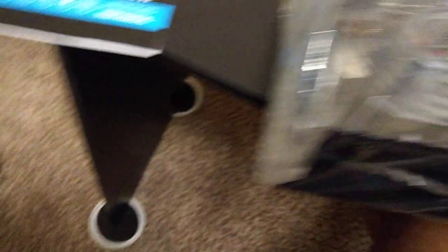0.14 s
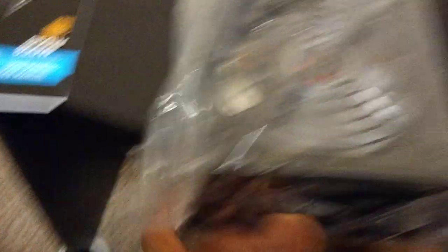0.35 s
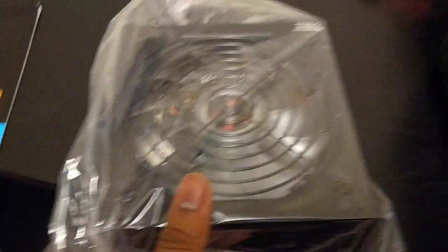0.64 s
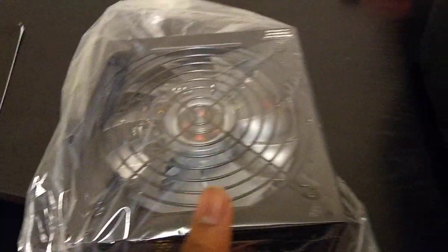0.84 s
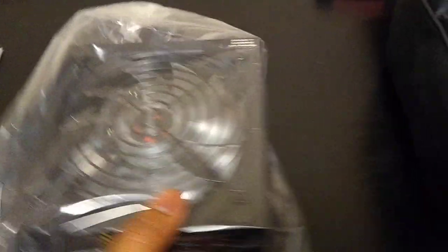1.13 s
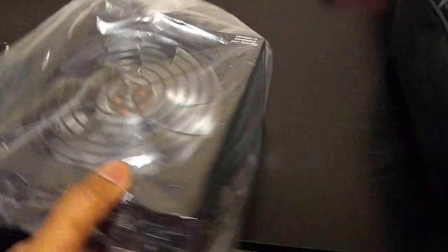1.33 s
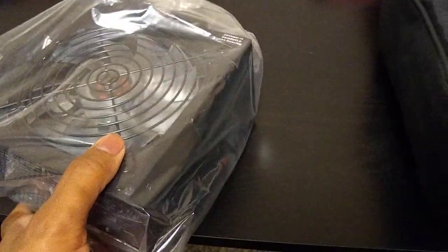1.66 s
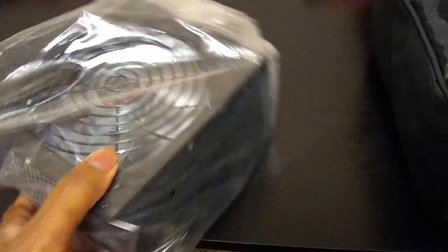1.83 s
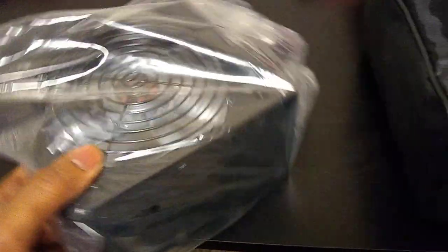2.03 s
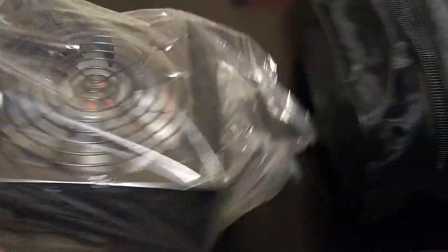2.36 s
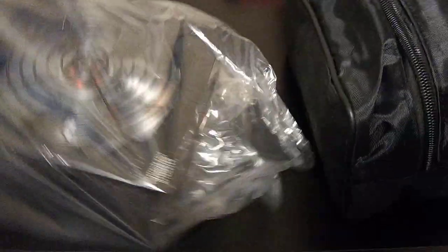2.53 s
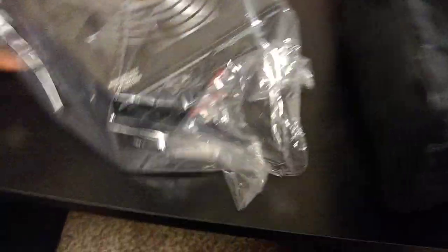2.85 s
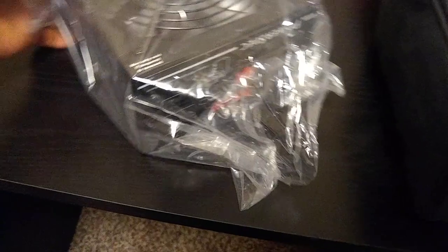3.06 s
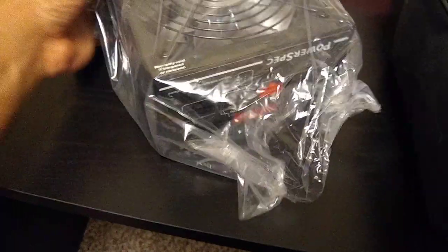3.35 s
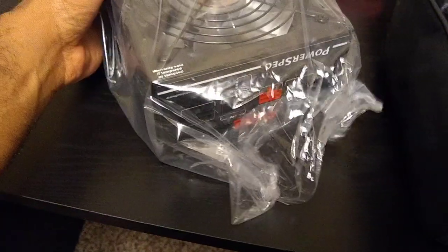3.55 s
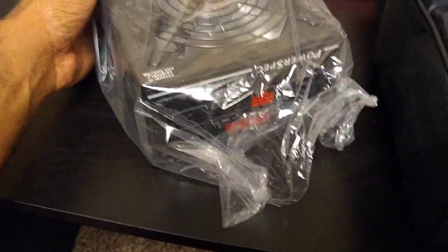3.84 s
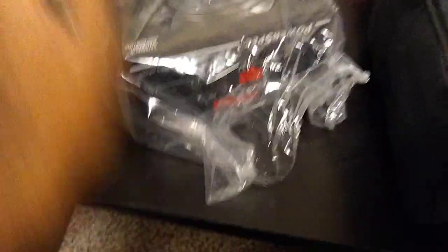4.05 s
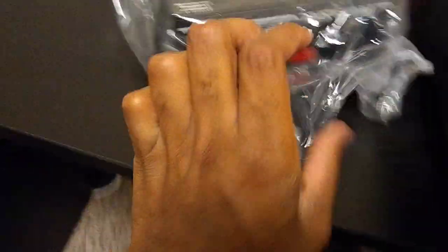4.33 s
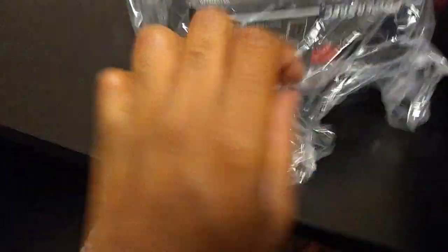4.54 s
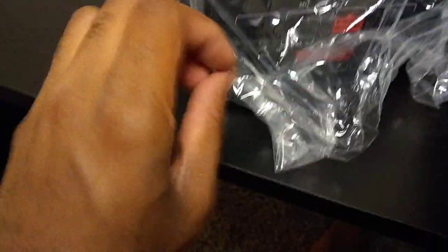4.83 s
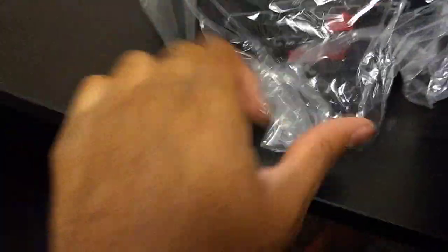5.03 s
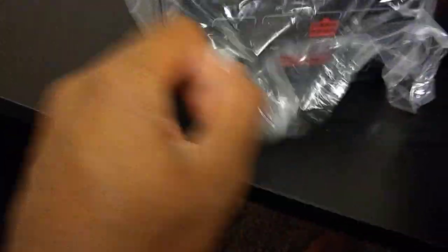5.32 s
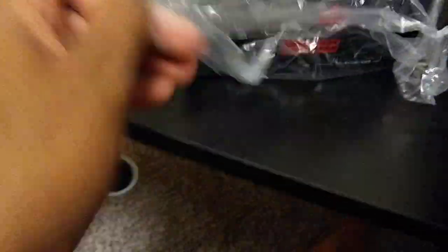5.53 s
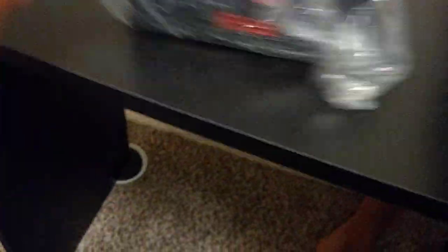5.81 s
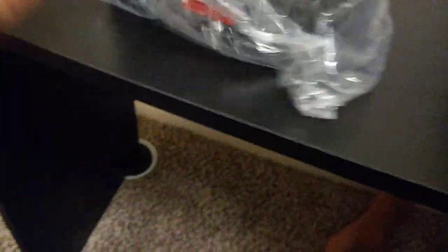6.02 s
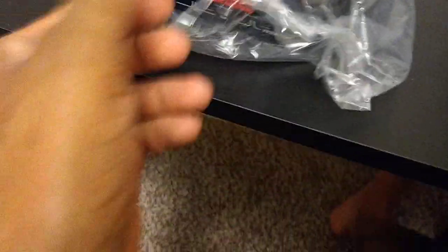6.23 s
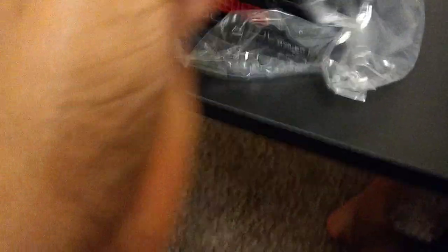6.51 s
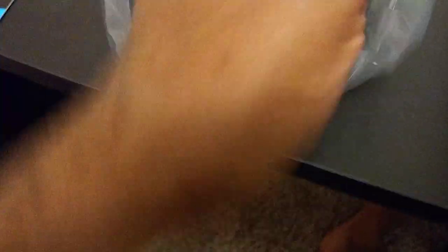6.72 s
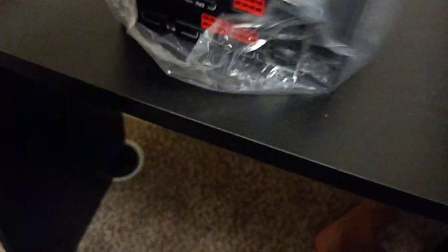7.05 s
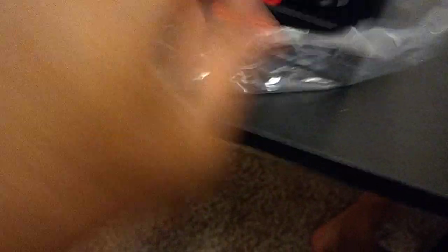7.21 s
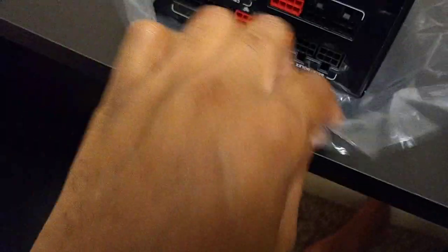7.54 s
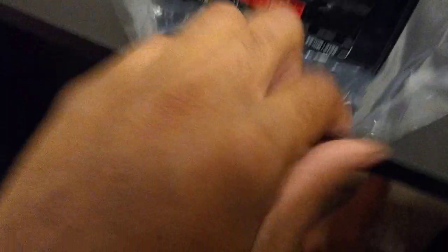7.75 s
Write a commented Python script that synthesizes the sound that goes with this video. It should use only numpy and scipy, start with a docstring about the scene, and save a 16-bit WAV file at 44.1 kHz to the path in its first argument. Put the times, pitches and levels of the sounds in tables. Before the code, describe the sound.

Close to the microphone in a small carpeted room, a hand handles thin plastic film around a heavy metal case. Light ticks and rustles come first, then one solid knock on the desk and a short dull drag. Sharper crinkles and snaps follow with a softer bump, a brief lull, then denser, louder crackling as the bag is gathered and tugged, over a very faint steady hush.

```python
"""A thin plastic bag rustles, ticks and snaps as a hand gathers and pulls it: swarms of tiny noise clicks.
Inside is a metal power supply; its case knocks on a desk as decaying sines with noise thuds, and drags
as a dense swarm of dull clicks. Film sliding with the case adds a smooth hiss of coloured noise.
Faint gliding sine tones and a steady noise hush lie behind, in a small carpeted room of decaying noise echoes.
All is heard from close by through the two ports of a phone, which widens the stereo and limits the band."""
import sys
import numpy as np
from scipy import signal
from scipy.fft import rfft, irfft, next_fast_len
from scipy.io import wavfile
from scipy.ndimage import uniform_filter1d

SR = 44100
rng = np.random.default_rng(int(sys.argv[2]) if len(sys.argv) > 2 else 0)


def bounce(signal):
    """Save signal as a 16-bit WAV file at the path given by the first command-line argument."""
    frames = np.transpose(np.atleast_2d(signal))
    limited = np.clip(frames, -1, 1)
    pcm = np.round(limited * 32767).astype(np.int16)
    wavfile.write(sys.argv[1], SR, pcm)


N = 347508
TIME = np.arange(N) / SR  # seconds
TOP_HZ = 15750  # upper edge of the band


def amp(db):
    """Decibels to gain."""
    return 10 ** (np.asarray(db) / 20)


def unit(x):
    """Scale a sound to rms 1."""
    return x / np.sqrt(np.mean(x ** 2) + 1e-20)


def along(points, hz):
    """Read a curve of (Hz, value) points on a log frequency axis."""
    f, v = np.transpose(points)
    return np.interp(np.log(hz + 1), np.log(f + 1), v)


def filtered(x, response):
    """Multiply the spectrum of x by a response, given as a function of frequency."""
    m = next_fast_len(N + SR // 4)
    hz = np.fft.rfftfreq(m, 1 / SR)
    return irfft(rfft(x, m) * response(hz), m)[..., :N]


def coloured(x, spectrum, size=2048):
    """Colour x with a minimum-phase filter of unit energy, so that nothing sounds ahead of time."""
    hz = np.fft.rfftfreq(size, 1 / SR)
    cepstrum = irfft(np.log(amp(along(spectrum, hz))))
    # folding the cepstrum forward in time makes the filter causal
    cepstrum[1:size // 2] *= 2
    cepstrum[size // 2 + 1:] = 0
    kernel = irfft(np.exp(rfft(cepstrum)))
    kernel = kernel[None] / np.linalg.norm(kernel)
    return signal.fftconvolve(x, kernel, axes=1)[:, :x.shape[1]]


def add(track, s, sound):
    """Mix a sound into a track at s seconds."""
    part = track[:, round(s * SR):][:, :sound.shape[-1]]
    part += sound[..., :part.shape[1]]


# Spectrum of the hush. Each row: frequency in Hz, relative density in dB per Hz.
HUSH_SPECTRUM = [(25, -15.5), (130, 0), (300, 1.5), (550, -2.5), (1200, -14), (2200, -14), (3300, -20.5),
                 (7000, -27.5), (15500, -21.5)]


def hush():
    """A faint steady bed of coloured noise, partly alike at both ports."""
    noise = rng.standard_normal((2, N)) + rng.standard_normal(N)
    return amp(-77.0) * unit(coloured(noise, HUSH_SPECTRUM))


# Faint low tones. Each row: start in seconds, end in seconds, start pitch in Hz, end pitch in Hz,
# peak level in dB before a trim of -4 dB.
TONES = [(4.04, 4.239, 455, 447, -67), (6.38, 6.7, 155.6, 146.5, -67.5), (7.05, 7.25, 106.7, 115.4, -62),
         (7.12, 7.529, 201, 121.7, -68), (7.5, 7.858, 113, 108, -65)]


def tones():
    """Sines that glide in a straight line and swell and fade along half a sine arch."""
    track = np.zeros((2, N))
    for start, end, start_hz, end_hz, db in TONES:
        u = np.linspace(0, 1, int((end - start) * SR))
        pitch = start_hz + (end_hz - start_hz) * u
        phase = 2 * np.pi * np.cumsum(pitch) / SR
        add(track, start, amp(db - 4.0) * np.sin(np.pi * u) * np.sin(phase))
    return track


# How fast the room dies away. Each row: frequency in Hz, time to fall by 60 dB in seconds.
ROOM_DECAY = [(100, 0.27), (400, 0.17), (2000, 0.082), (8000, 0.06), (16000, 0.082)]


def room(x, alike_hz):
    """Noise echoes, drawn anew every eighth of a second so that no pitch lingers; each frequency has its own decay."""
    wet, step = np.zeros((2, N)), SR // 8
    for start in range(0, N, step):
        hz, t, z = signal.stft(rng.standard_normal((2, SR // 3)), SR, nperseg=256)
        decay = amp(-60 * t / along(ROOM_DECAY, hz)[:, None])
        tail = signal.istft(z * decay, SR, nperseg=256)[1]
        echo = signal.fftconvolve(x[:, start:start + step], tail / np.linalg.norm(tail[0]), axes=1)
        add(wet, start / SR + .003, echo)  # the echo sets in 3 ms late
    # long waves reach both ports alike: all mid at the bottom, equal mid and side at the top
    turn = lambda hz: np.pi / 4 * (1 - 1 / (1 + (hz / alike_hz) ** 2))
    mid, side = filtered(wet, lambda hz: np.array([np.cos(turn(hz)), np.sin(turn(hz))]))
    return np.array([mid + side, mid - side])


# The case meets the desk. Each row: time in seconds, relative level in dB,
# hardness of the contact in dB per octave above 400 Hz.
KNOCKS = [(0.004, -47.5, 5.5), (1.070, -49, 5.5), (1.108, -57, -6), (1.589, -13.5, -2.5), (1.608, -27, 2),
          (1.636, -23, -9), (1.708, -37, -7), (2.454, -26.5, -12.5), (2.498, -38.5, -7), (2.557, -36.5, -1),
          (3.747, -23.5, -7.5), (5.073, -46.5, 0), (5.917, -49, 8), (5.962, -46.5, 1), (6.025, -50, -9),
          (6.069, -51.5, -16), (6.704, -45.5, 7.5), (7.777, -35.5, -2)]
# Case and desk top ringing together. Each row: mode in Hz, relative level in dB,
# time to fall by 60 dB in seconds at hardness 0.
DESK_MODES = [(141.2, -18.5, 0.17), (198, -23.5, 0.34), (266.7, -9.5, .22), (301.3, 6.5, 0.059),
              (328, -9, 0.24), (379, -12, 0.046), (471, -13, 0.25), (549, -9, 0.11), (640.4, -17.5, 0.076),
              (819.6, -19, .2), (960, -20.5, 0.18), (1037, -8, 0.066), (1424, -23, 0.23)]
# Spectrum of the thud. Each row: frequency in Hz, relative density in dB per Hz.
THUD_SPECTRUM = [(35, -48.5), (85, -20), (130, -5), (400, 9), (600, -4.5), (1000, -7.5), (2000, -15.5),
                 (4000, -26.5), (12000, -48.5)]


def knocks():
    """Each contact gives a short noise thud and rings the modes of the case and the desk top."""
    ring, thud, t = np.zeros((2, N)), np.zeros((2, N)), np.arange(SR // 2) / SR
    hz, mode_db, t60 = np.transpose(DESK_MODES)[:, :, None]
    for s, db, hard_db in KNOCKS:
        # a soft contact leaves the upper modes quiet, and the hand damps the ring
        tilt_db = hard_db * np.log2(np.maximum(hz / 400, 1))
        strength = amp(mode_db + rng.normal(0, 1.91, hz.shape) + tilt_db)
        decay = t60 * amp(0.13 * hard_db)
        pitch = hz * (1 + rng.normal(0, 0.008, hz.shape))
        modes = strength * amp(-60 * t / decay) * np.sin(2 * np.pi * pitch * t)
        onset = 1 - np.exp(-t / 0.00387)
        add(ring, s, amp(db - 3) * modes.sum(axis=0) * onset)
        burst = rng.standard_normal(len(t)) * amp(-60 * t / .13)
        add(thud, s, amp(db + hard_db / 2 - 5) * burst)
    return ring + coloured(thud, THUD_SPECTRUM)


def clicks(times, sizes, spectrum, life, colour_db, scatter_s, size=256, count=9):
    """Tiny decaying noise bursts, for film or case, each with its own length, colour and direction."""
    n, t, hz = len(times), np.arange(size) / SR, np.fft.rfftfreq(size, 1 / SR)
    noise = rng.standard_normal((n, size))
    own_life = life * np.exp(0.99 * rng.standard_normal((n, 1)))  # decay constant in seconds
    z = rfft(noise * np.exp(-t / own_life))
    # every click favours different pitches
    knots = np.linspace(0, 1, count)
    blend = np.array([np.interp(np.sqrt(hz / hz[-1]), knots, row) for row in np.eye(count)])
    z *= amp(colour_db * rng.standard_normal((n, count)) @ blend)
    # sizes hold for the energy that is left after colouring and the band limit
    weights = amp(along(spectrum, hz)) ** 2 * (hz < TOP_HZ)
    energy = np.average(abs(z) ** 2, axis=1, weights=weights)
    z *= (sizes / np.sqrt(energy))[:, None]
    # its direction sets the level and the time of arrival at each port
    pan_db = 2.1 * rng.standard_normal((n, 1))
    lag = scatter_s * rng.standard_normal((n, 1))
    where = ((times * SR).astype(int)[:, None] + np.arange(size)).ravel()
    ports = []
    for side in (1, -1):
        delay = size / SR / 10 + side * lag / 2
        port = irfft(z * amp(side * pan_db) * np.exp(-2j * np.pi * hz * delay))
        ports.append(np.bincount(where, port.ravel(), N)[:N])
    return coloured(np.array(ports), spectrum)


def crinkle(level_db, spectrum, rate, spread_db, life, evenness):
    """A swarm of unequal clicks, denser as well as louder under harder handling; rate is per second at -55 dB."""
    density = np.cumsum(rate * amp(.12 * np.clip(level_db + 55, -30, 20))) / SR
    places = np.sort(rng.uniform(0, density[-1], int(density[-1])))
    times = np.interp(places, density, TIME)
    sizes = amp(spread_db * np.minimum(rng.exponential(size=len(times)), 4))
    swarm = clicks(times, sizes, spectrum, life, colour_db=2.5, scatter_s=.00016)
    # even out the chance loudness of the swarm over each 50 ms
    power = abs(uniform_filter1d(np.mean(swarm ** 2, axis=0), SR // 20))
    evened = swarm / (power + power.mean() / 100) ** (evenness / 2)
    return amp(level_db) * unit(evened)


# Spectrum of the dragging case. Each row: frequency in Hz, relative density in dB per Hz.
DRAG_SPECTRUM = [(30, -35.5), (80, -23), (140, -4.5), (300, 4), (480, -5), (750, -14.5), (2000, -37)]


def drag(drag_db):
    """The case sticks and slips as it is pushed about: a swarm of dull, nearly equal clicks."""
    return crinkle(drag_db - 3.5, DRAG_SPECTRUM, rate=400, spread_db=0.5, life=0.00092, evenness=0.6)


# Spectrum of the hiss. Each row: frequency in Hz, relative density in dB per Hz.
HISS_SPECTRUM = [(400, -13.5), (1500, -0.5), (3400, 3.5), (6000, -7.5), (9000, -10), (15500, -3.5)]


def hiss(fold_db, drag_db):
    """Where the film slides with the case it gives a smooth hiss, partly alike at both ports."""
    noise = rng.standard_normal(N) + amp(-1.5) * rng.standard_normal((2, N))
    return amp(np.minimum(fold_db, drag_db) - 6.5) * unit(coloured(noise, HISS_SPECTRUM))


# A movement takes hold, swells towards its middle and dies away.
RISE_DB_PER_S, ARCH_DB, RELEASE_DB_PER_S = 1100, 3.5, 240


def movement(start, length, db):
    """Power of one movement of the hand: attack, an arched hold, release."""
    t = TIME - start
    arch_db = ARCH_DB * (np.sin(np.pi * np.clip(t / length, 0, 1)) - .5)
    attack_db = RISE_DB_PER_S * np.clip(-t, 0, 1)
    release_db = RELEASE_DB_PER_S * np.clip(t - length, 0, 1)
    return amp(db + arch_db - attack_db - release_db) ** 2


REST_DB, CREASE_DB = -79.5, -8.5  # the folds at rest; the creases relative to the folds
SETTLE_DB, SETTLE_DB_PER_S = -15, 280  # the film rustles on after a snap
JOSTLE_DB = -17  # how much of the film's movement shifts the case
# The hand grips or pulls the film. Each row: start in seconds, length in seconds,
# rustle drive in dB, crispness of the creases in dB.
STROKES = [(0.004, .02, -58, 0), (0.497, .065, -53, 2), (0.58, .09, -64, 2), (0.72, .35, -68, 0),
           (1.073, .04, -53, -3.5), (1.161, .02, -55, -3), (1.221, .16, -69, 0), (1.405, .2, -48.5, -0.5),
           (1.62, .12, -48, 1), (1.86, .08, -60, -4), (1.951, .04, -52, 3), (2.002, .33, -58.5, 3),
           (2.33, .27, -51.5, 2.5), (2.62, 1.1, -63.5, 1), (2.757, .06, -57, 4), (2.877, .03, -56, 1),
           (3.009, .06, -54, 2), (3.242, .055, -54, 3), (3.476, .06, -46, 1), (3.722, .04, -44, 0),
           (3.987, .16, -68, -1.5), (4.043, .025, -60, -0.5), (4.495, .08, -65, -5), (4.58, .225, -52, 0),
           (4.69, .05, -43, -0.5), (4.818, .025, -54, -1), (4.877, .015, -58, 0), (5.049, .02, -53, -2.5),
           (5.09, .08, -64, -6.5), (5.234, .035, -46, 1), (5.291, .13, -50, 0), (5.431, .16, -40.5, 2),
           (5.6, .18, -52, 2.5), (5.81, .06, -43, 4), (5.889, .29, -55.5, 4.5), (6.22, .09, -71, 0),
           (6.497, .015, -49, 0), (6.54, .15, -52, 0), (6.695, .045, -40.5, 0.5), (6.76, .23, -48, 4),
           (7.055, .04, -42, 2), (7.165, .025, -54, 5), (7.329, .27, -70, -1), (7.625, .085, -48, 8),
           (7.739, .14, -56, -1)]
# The wrapped case slides on the desk. Each row: start in seconds, length in seconds, drive in dB.
SLIDES = [(0.0, .06, -62), (0.495, 0.0692, -61), (1.751, .35, -66), (2.122, .32, -60), (2.461, .12, -50),
          (5.92, .2, -56), (7.116, .48, -74), (7.695, .18, -63)]


def handling():
    """Drive in dB of the folds, the creases and the sliding case, from the strokes, snaps and slides."""
    folds = np.full(N, amp(REST_DB) ** 2)
    creases = np.full(N, amp(REST_DB + CREASE_DB) ** 2)
    for start, length, db, crisp_db in STROKES:
        power = movement(start, length, db)
        folds += power
        creases += power * amp(CREASE_DB + crisp_db) ** 2
    film = np.array([folds, creases])
    settling = amp(SETTLE_DB - SETTLE_DB_PER_S * TIME[:SR // 4])
    for s, tick_db, sheet_db in SNAPS:
        add(film, s, np.outer(amp([sheet_db, tick_db - 2.5]), settling) ** 2)
    case = film[0] * amp(JOSTLE_DB) ** 2 + sum(movement(*slide) for slide in SLIDES)
    return 10 * np.log10([*film, case])


def snaps(s, level_db, spectrum, life, follow_db, settle, count=7):
    """A crease snaps through and sets off a short run of weaker clicks; settle is their mean delay in seconds."""
    delay = rng.exponential(settle, (len(s), count))
    sizes = amp(follow_db + 2 * rng.standard_normal(delay.shape) - 4 * delay / settle)
    delay[:, 0], sizes[:, 0] = 0, 1  # the snap itself
    times = s[:, None] + delay
    sizes = sizes * amp(level_db)[:, None]
    return clicks(times.ravel(), sizes.ravel(), spectrum, life, colour_db=4.5, scatter_s=.00006)


def stray_snaps(fold_db, crease_db):
    """Rows like those of SNAPS for lesser creases that give way at random, 14 a second."""
    count = int(14 * N / SR)
    at = rng.integers(0, N, count)
    # 2 dB over the drive of the moment, give or take up to 10 dB
    levels_db = np.transpose([crease_db[at], fold_db[at]]) + 2 + rng.uniform(-10, 10, (count, 2))
    return np.column_stack([at / SR, levels_db])


def taut(x):
    """Film stretched over the case rings like a drumskin at 754 Hz, until the hand gathers it up loose."""
    skin = signal.lfilter(*signal.iirpeak(754, 7.1, fs=SR), x)
    tension = np.interp(TIME, [3.4, 4.5], [1, 0])
    return x * amp(-1.5 * tension) + tension * skin


# Creases that snap through. Each row: time in seconds, bright tick in relative dB,
# dull pop of the sheet around it in relative dB.
SNAPS = [(0.4953, -59.5, -44.5), (0.5298, -48, -51.5), (0.5523, -48, -48.5), (0.6509, -57, -53),
         (0.8668, -55.5, -54.5), (0.9124, -76, -49), (0.9454, -51, -53), (1.0056, -61, -55),
         (1.0764, -49.5, -45.5), (1.163, -51, -51), (1.3449, -53.5, -58.5), (1.3723, -56.5, -48),
         (1.4034, -44, -39.5), (1.4638, -45, -51), (1.5037, -47, -37.5), (1.6483, -40, -60.5),
         (1.8216, -66.5, -47), (1.9526, -46, -43), (1.9658, -45, -48), (2.145, -52, -51),
         (2.184, -60.5, -47), (2.4112, -39.5, -47.5), (2.5563, -47.5, -45), (2.7681, -47.5, -62),
         (2.949, -51, -64.5), (3.2416, -40, -38.5), (3.3702, -55.5, -48), (3.5281, -44.5, -43.5),
         (3.6088, -54, -43.5), (3.713, -58.5, -47), (3.7435, -37, -40), (3.802, -55.5, -45),
         (4.3014, -58, -52), (4.8762, -54, -46.5), (4.993, -60, -53.5), (5.0596, -57, -41),
         (5.1831, -51, -33.5), (5.2357, -47.5, -37), (5.3159, -56.5, -38), (5.4259, -36.5, -37),
         (5.544, -38.5, -35.5), (5.7821, -43.5, -56.5), (5.8142, -37, -40.5), (6.1934, -55.5, -56),
         (6.3717, -65.5, -59.5), (6.479, -59.5, -47.5), (6.4983, -42.5, -51), (6.6359, -44.5, -39),
         (6.6954, -36.5, -34), (6.9682, -44.5, -40.5), (7.165, -42.5, -46), (7.2672, -54.5, -58),
         (7.337, -54.5, -52.5), (7.4168, -55, -54), (7.5104, -51, -44), (7.5551, -57.5, -56),
         (7.5854, -53, -55.5), (7.6154, -42, -45.5), (7.6663, -43, -39), (7.6968, -35, -47.5),
         (7.8232, -51.5, -41.5)]
# Spectra of the folds and of the creases. Each row: frequency in Hz, relative density in dB per Hz.
FOLD_SPECTRUM = [(30, -48.5), (110, -13), (400, -7), (750, -1), (1450, 1), (2200, 3), (3300, -3.5),
                 (5400, -10), (8000, -20.5), (16000, -31.5)]
CREASE_SPECTRUM = [(300, -54), (2000, -7), (4000, 4), (5300, 2), (7500, -2), (12000, 0), (15500, 2)]


def bag(fold_db, crease_db):
    """Broad folds flex with a papery rustle; sharp creases tick above them."""
    s, tick_db, sheet_db = np.vstack([SNAPS, stray_snaps(fold_db, crease_db)]).T
    fold_life, crease_life = .0016, .001  # typical decay constants of a click, seconds
    folds = crinkle(fold_db - .9, FOLD_SPECTRUM, rate=700, spread_db=3.5, life=fold_life, evenness=0.896)
    creases = crinkle(crease_db + 1.07, CREASE_SPECTRUM, rate=650, spread_db=4.0, life=crease_life,
                      evenness=0.66)
    sheet = snaps(s, sheet_db + 18.5, FOLD_SPECTRUM, life=fold_life, follow_db=-9.5, settle=.008)
    ticks = snaps(s, tick_db + 22.5, CREASE_SPECTRUM, life=crease_life, follow_db=-10.5, settle=0.0091)
    return taut(folds + sheet) + creases + ticks


def scene():
    """Bag and case in the room, over the faint tones and the steady hush."""
    fold_db, crease_db, drag_db = handling()
    film = bag(fold_db, crease_db) + hiss(fold_db, drag_db)
    case = knocks() + drag(drag_db)
    # the sound of the desk reaches the left port 0.24 ms later
    desk = filtered(case, lambda hz: np.exp(-2j * np.pi * np.outer([.00024, 0], hz)))
    echoes = amp(-9.0) * room(film, alike_hz=890) + amp(-7.5) * room(case, alike_hz=250)
    return film + desk + echoes + tones() + hush()


# Share of the opposite port that is taken away. Each row: frequency in Hz, share as a gain before
# a ceiling of 0.9 and a weight for each port.
CROSSFEED = [(400, 0.031), (850, 1), (2200, 0.77), (4400, 0.59), (6700, 0.36), (10000, 0.16), (15000, .1)]
# Balance between the ports. Each row: frequency in Hz, left minus right in dB.
BALANCE = [(60, 0.5), (160, 5.5), (350, 3.5), (700, -2), (4500, -0.5), (9000, 3), (12000, 9), (15500, 0)]


def record(dry):
    """The phone widens its stereo by taking a delayed share of each port from the other, then limits the band."""
    bleed = lambda hz: np.clip(along(CROSSFEED, hz), 0, .9)
    port_delay = 1 / 2220  # seconds
    # the left port loses more than the right
    share = lambda hz: np.outer([1.2, .8], bleed(hz) * np.exp(-2j * np.pi * hz * port_delay))
    wide = dry - filtered(dry[::-1], share)
    # lean the balance and make up for the power that the crossfeed adds
    balance = lambda hz: amp(np.outer([.5, -.5], along(BALANCE, hz))) / np.hypot(1, bleed(hz))
    return filtered(filtered(wide, balance), lambda hz: hz < TOP_HZ)


dry = scene()
out = record(dry)
bounce(out)
```